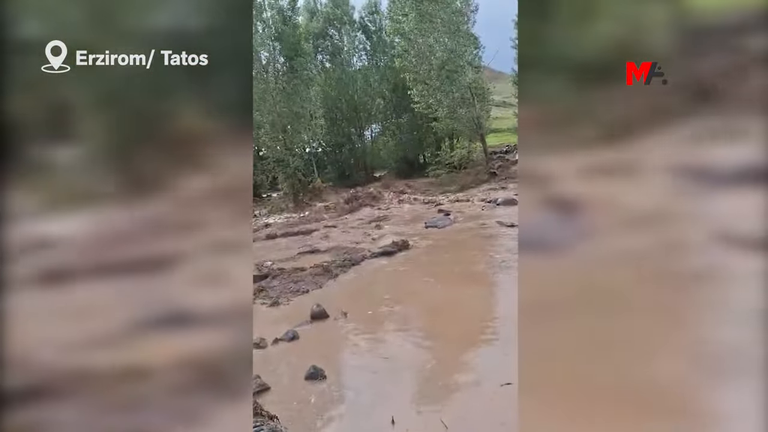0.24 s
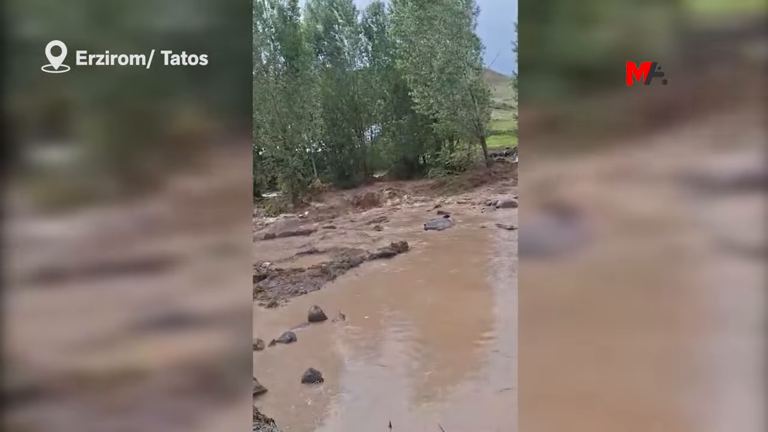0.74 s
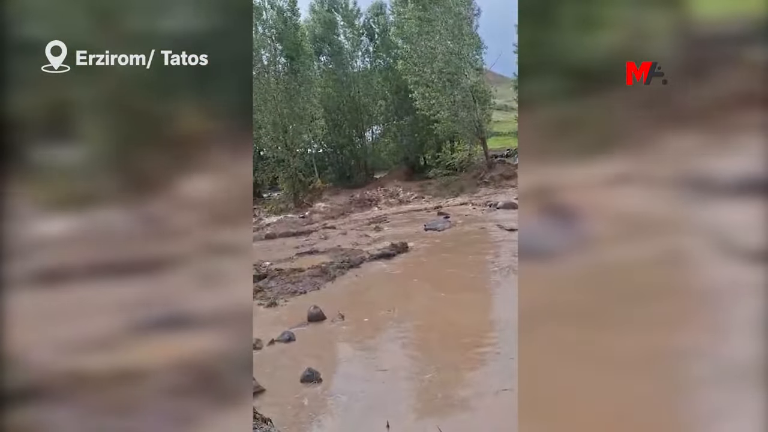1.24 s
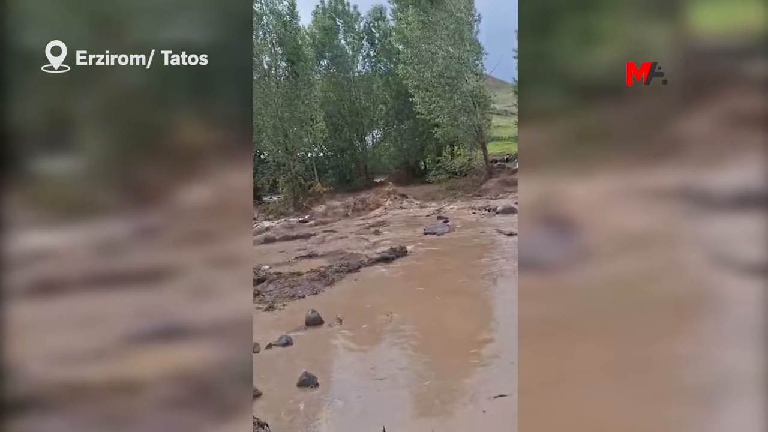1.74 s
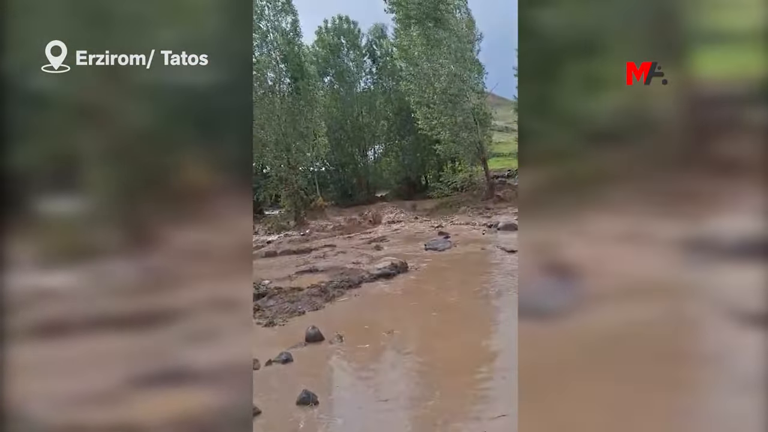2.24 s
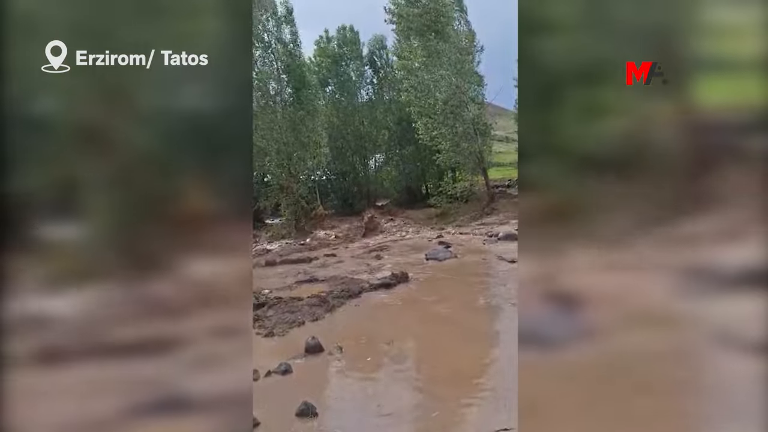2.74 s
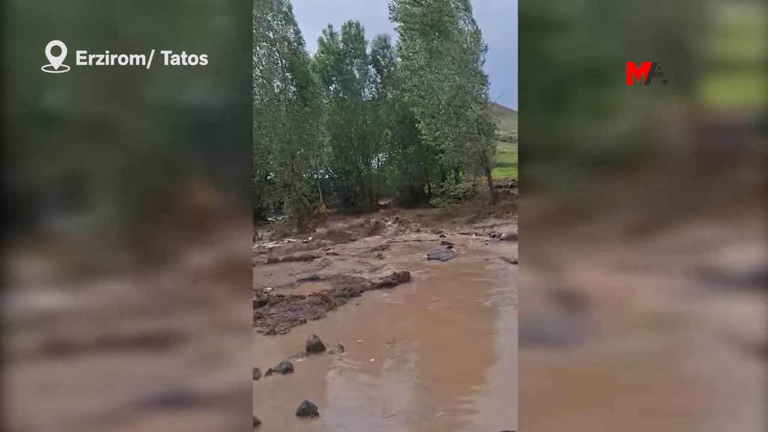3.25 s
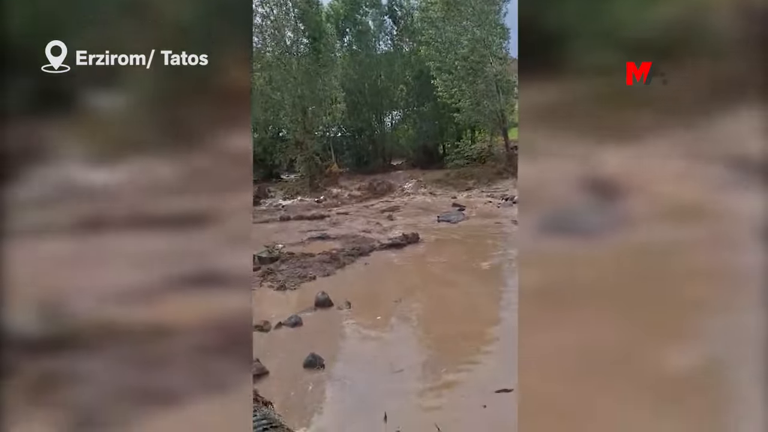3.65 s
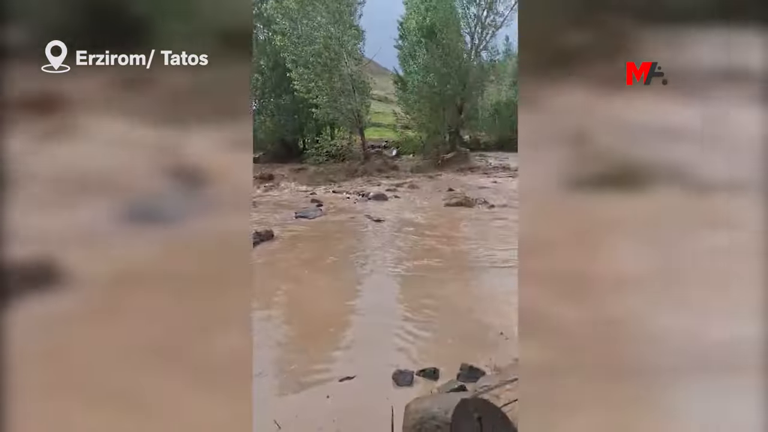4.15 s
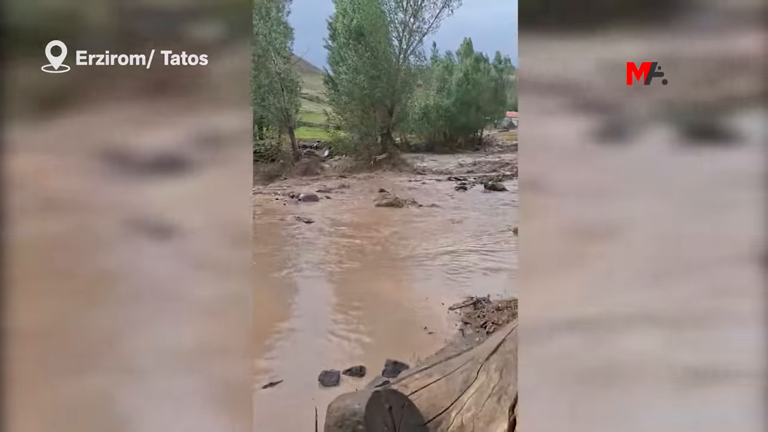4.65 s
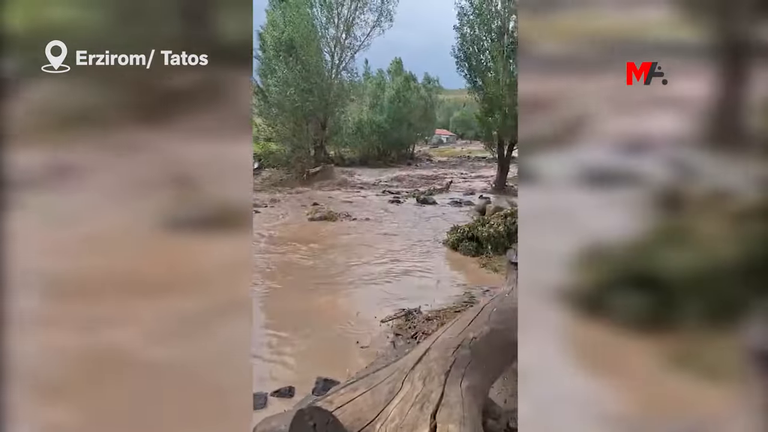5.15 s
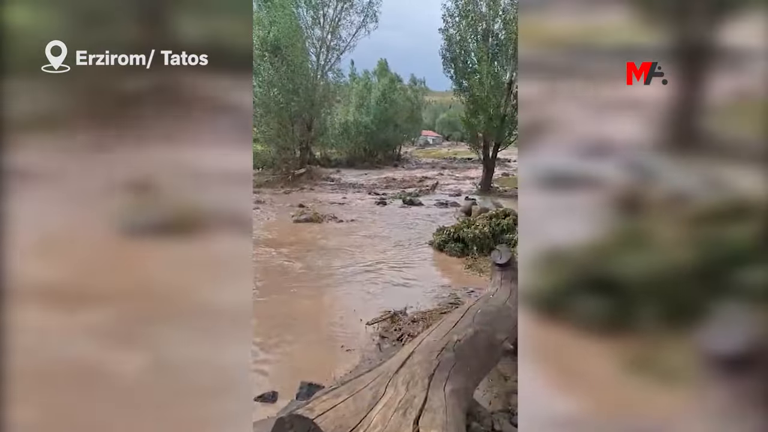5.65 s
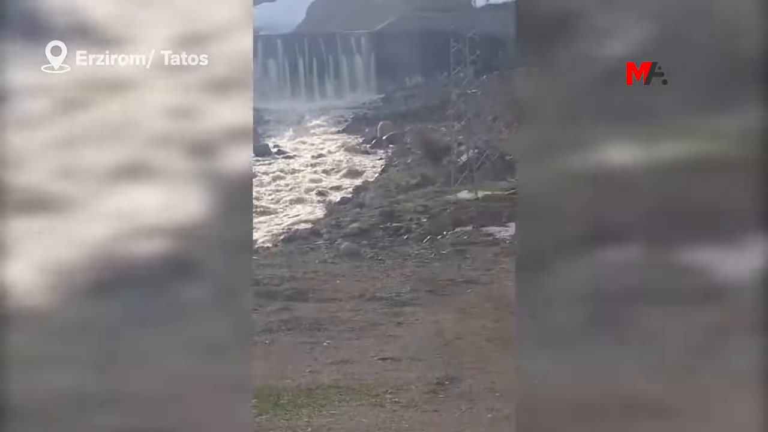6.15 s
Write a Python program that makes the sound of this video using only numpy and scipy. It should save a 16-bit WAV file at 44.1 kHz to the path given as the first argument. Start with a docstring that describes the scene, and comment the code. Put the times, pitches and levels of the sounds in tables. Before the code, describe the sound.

Close, wide stereo sound of fast floodwater, a dense steady rush with small splashes and gurgles. Over it lies rough wind noise on an unprotected handheld microphone: irregular low thuds, ragged puffs and fluttering, strongest around the middle and again late. The right side momentarily becomes thin and hollow. Water dips a little, partly recovers, then an abrupt cut leaves silence.

```python
"""A muddy flood roars and splashes over rocks, heard from the bank through a microphone's left and right ports.
The water is coloured noise mixed with many short bubble rings.
Wind is lumpy noise, with short swinging tones for hard thumps and ragged puffs of noise for flurries.
At times the rumble drops away on the right; loud peaks are clipped, and the sound is cut off before the end."""
import sys
import numpy as np
from scipy import signal
from scipy.fft import rfft, irfft, next_fast_len
from scipy.io import wavfile
from scipy.ndimage import uniform_filter1d

SR = 44100
rng = np.random.default_rng(int(sys.argv[2]) if len(sys.argv) > 2 else 0)


def inscribe(sig):
    """Save sig as 16-bit PCM at rate SR to the path in sys.argv[1].

    A 1-D sig is mono; a 2-D sig holds one channel per row.
    Samples are clipped to [-1, 1] before scaling.
    """
    pcm = np.round(np.clip(np.atleast_2d(sig).T, -1, 1) * 32767)
    wavfile.write(sys.argv[1], SR, pcm.astype(np.int16))


N = 282681
TIME = np.arange(N) / SR  # seconds


def gain_of(db):
    """Turns decibels into a factor for the wave's height."""
    return 10 ** (np.asarray(db) / 20)


def evened(x):
    """Scales a sound to an average strength (rms) of 1."""
    return x / np.sqrt(np.mean(x ** 2) + 1e-20)


def read(points, hz):
    """Reads the columns of a frequency table at the given frequencies, on a logarithmic pitch scale."""
    f, *columns = np.transpose(points)
    return [np.interp(np.log(hz + 1), np.log(f + 1), column) for column in columns]


def follow(rows):
    """Reads the columns of a time table at every sample."""
    s, *columns = np.transpose(rows)
    return [np.interp(TIME, s, column) for column in columns]


def coloured(x, spectrum):
    """Makes some pitches stronger than others, as the table says, then evens the strength."""
    size = next_fast_len(N)
    shape = gain_of(read(spectrum, np.fft.rfftfreq(size, 1 / SR))[0])
    return evened(irfft(rfft(x, size) * shape, size)[..., :N])


def wobble(rate_hz):
    """Smooth random drift of strength about 1; changes faster than the rate fade out."""
    size = next_fast_len(N)
    hz = np.fft.rfftfreq(size, 1 / SR)
    smooth = rfft(rng.standard_normal(size)) / (1 + (hz / rate_hz) ** 4)
    return evened(irfft(smooth, size))[:N]


def panned(db, tilt_db):
    """Gains of the left and right port for a level and a left minus right difference."""
    return gain_of(db + np.array([[tilt_db], [-tilt_db]]) / 2)


def bubbles(per_s, spread_db, cycles, low_hz, high_hz, count):
    """Bubbles of many sizes, each a short fading ring that rises in pitch; each size swells in clusters."""
    cluster_s, cluster_db = 0.04, 3.5  # spacing of clusters, and how much their levels differ
    out, t = np.zeros(N), np.arange(2500) / SR
    chance = per_s / count / SR  # of a bubble of one size at one sample
    knots = np.arange(0, N / SR + cluster_s, cluster_s)
    for hz in np.geomspace(low_hz, high_hz, count):
        age = t * hz  # in cycles
        swing = np.sin(2 * np.pi * age * (1 + 0.016 * age / cycles))
        ring = swing * np.exp(-age / cycles) * hz
        draw, pops = rng.random(N), np.zeros(N)
        born = draw < chance
        cluster = np.interp(TIME[born], knots, rng.standard_normal(len(knots)))
        # Many bubbles are soft and a few are much louder.
        loudness = np.minimum(np.log(chance / draw[born]), 3)
        pops[born] = gain_of(spread_db * loudness + cluster_db * cluster)
        out += signal.oaconvolve(pops, ring)[:N]
    return evened(out)


def churn(splash_db, gurgle_db):
    """Countless far bubbles fuse into noise; nearer ones splash, and a few by the bank gurgle on their own."""
    splash = bubbles(per_s=1800, spread_db=2.5, cycles=6.6, low_hz=401.9, high_hz=9000, count=28)
    gurgle = bubbles(per_s=90, spread_db=1.0, cycles=19, low_hz=703.2, high_hz=4544, count=22)
    return rng.standard_normal(N) + gain_of(splash_db) * splash + gain_of(gurgle_db) * gurgle


def at_ports(pair, patchy_db):
    """Blends two unrelated sounds into what the turning ports hear, patchy in pitch and time."""
    # How water reaches the two ports before the turn. Each row: frequency in Hz, likeness from 0 to 1,
    # left lead in radians, left minus right in dB.
    port_rows = [(150, 1, -2, -5.5), (428, 0.8, 0, -1.5), (648, 0.95, -0.1, 0), (840, 0.6, .5, -2),
                 (1270, 0.84, 0.56, 1), (1732, 0.7, -0.5, -3.5), (1900, 0.9, 1.96, -3),
                 (2660, 0.3, 2, -0.5), (3560, 0.5, 4, -0.5), (5040, 0.03, 6, 0.6), (9050, 0.05, 9, 0)]
    # What the microphone's turn along the stream adds. Each row: frequency in Hz, level change in dB,
    # change of likeness.
    turn_rows = [(401, -1.8, -.1), (651, -1.4, -0.39), (1280, 1, -0.026), (2080, -2.4, 0.016),
                 (3620, 1.2, -0.094), (5220, 0.3, 0), (6910, 3, -0.057), (9040, -0.5, -0.016),
                 (15030, 0.8, 0)]
    turn_from_s, turn_s = 3.37, 0.7  # start and length of the turn
    hz, t, (left, other) = signal.stft(pair, SR, nperseg=1024, noverlap=768)
    patches = rng.standard_normal(left.shape[::-1]).T
    patches = uniform_filter1d(patches, size=12, axis=0)  # smooth across pitch
    patches = evened(uniform_filter1d(patches, size=10, axis=1))  # smooth across time
    alike, lead, tilt_db = (column[:, None] for column in read(port_rows, hz))
    turned = np.clip((t - turn_from_s) / turn_s, 0, 1)
    turn_db, turn_alike = (column[:, None] * turned for column in read(turn_rows, hz))
    alike = np.clip(alike + turn_alike, 0, 1)
    right = (alike * left + np.sqrt(1 - alike ** 2) * other) * np.exp(-1j * lead)
    both = np.array([left * gain_of(tilt_db / 2), right * gain_of(-tilt_db / 2)])
    both = both * gain_of(patchy_db * patches + turn_db)
    return signal.istft(both, nperseg=1024, noverlap=768)[1][:, :N]


def flood(roar_db, wash_db, spray_db, surge_db, lapping_db):
    """Deep roar of tumbling water, wash lapping over rocks and hissing spray, all surging together."""
    # The water's course before the level shifts given to this function.
    # Each row: time in seconds, roar level in dB, wash level in dB, spray level in dB.
    flood_rows = [(0, -21, -23, -24), (0.7, -21.5, -22.5, -24.5), (1.4, -21, -21, -24),
                  (2.0, -21.5, -22.5, -25), (2.3, -22.5, -22, -25), (2.6, -22, -23, -25.1),
                  (2.92, -21.5, -21.5, -26.5), (3.05, -21.5, -22, -25), (3.45, -23, -24, -25.6),
                  (3.72, -21.5, -24.5, -24.5), (3.9, -20.5, -25, -25.8), (3.97, -25.5, -25.5, -28.5),
                  (4.25, -25.5, -28, -30.5), (4.45, -24, -25.5, -29.5), (4.62, -23, -25.5, -28),
                  (4.85, -21.5, -23.5, -28.5), (5.25, -22, -24, -29), (5.5, -23, -24.5, -29),
                  (5.72, -21, -23, -27.5)]
    # Colours of the three parts of the water. Each row: frequency in Hz, relative level in dB per Hz.
    roar_colour = [(60, -15), (200, -6.5), (430, -0.5), (680, 1), (850, -10.5), (1200, -23.5),
                   (2000, -50.5)]
    wash_colour = [(400, -26), (700, -9), (900, -3), (1300, -2), (1650, -2.2), (2000, 1), (2400, -10.5),
                   (3200, -14.5), (5000, -41.5)]
    spray_colour = [(1200, -22.5), (2500, -5.5), (3000, -5), (3450, -0.5), (4000, -3.5), (5000, -1.5),
                    (6000, -6.5), (7700, -7), (8600, -12.5), (15800, -16.5)]
    roar_level, wash_level, spray_level = follow(flood_rows)
    pair = np.array([churn(splash_db=-10.5, gurgle_db=-13.5) for _ in range(2)])
    water = at_ports(pair, patchy_db=1.14)
    roar = gain_of(roar_level + roar_db) * coloured(water, roar_colour)
    lapping = lapping_db * wobble(rate_hz=27)
    wash = gain_of(wash_level + wash_db + lapping) * coloured(water, wash_colour)
    spray = gain_of(spray_level + spray_db) * coloured(water, spray_colour)
    return (roar + wash + spray) * gain_of(surge_db * wobble(rate_hz=39))


def eddies(spectrum, lumpy_db, rate_hz):
    """Swirling air presses on the ports as lumpy noise, partly shared by the two."""
    # How alike the eddies are at the two ports. Each row: time in seconds, likeness from 0 to 1.
    alike_rows = [(0, 0.6), (1.2, 1), (2.6, 0.34), (3.5, 0.6), (4, 0), (4.7, 0.62), (5.7, 0.01)]
    alike = np.clip(follow(alike_rows)[0], 0, 1)
    shared, separate = rng.standard_normal(N), rng.standard_normal((2, N))
    air = np.sqrt(alike) * shared + np.sqrt(1 - alike) * separate
    return evened(coloured(air, spectrum) * gain_of(lumpy_db * wobble(rate_hz)))


def wind(buffet_db, flutter_db, flutter_gain):
    """Large eddies buffet the ports and small ones flutter above them; both rise and fall with the gusts."""
    # The wind's course before gusts and the level shifts given to this function.
    # Each row: time in seconds, buffeting level in dB, flutter level in dB.
    wind_rows = [(0, -18, -21.5), (0.3, -20.5, -21.5), (0.85, -23.5, -19.5), (1.15, -18.5, -21.5),
                 (1.65, -18.5, -19.5), (1.9, -19, -19.5), (2.4, -17, -17), (2.92, -17, -18.5),
                 (2.97, -16.5, -28), (3.27, -19.5, -21.5), (3.56, -18.5, -22), (3.63, -22.5, -22),
                 (4.1, -14.5, -23), (4.27, -20.5, -23), (4.6, -19.5, -21), (4.8, -26, -21),
                 (5.05, -20, -20.5), (5.21, -21, -21.5), (5.45, -17, -19.5), (5.65, -24, -23),
                 (5.74, -24, -26)]
    # Colours of the two kinds of eddy. Each row: frequency in Hz, relative level in dB per Hz.
    buffet_colour = [(15, -34), (33, -21), (55, -1.5), (80, -2.5), (130, -4), (200, -11), (400, -26.5),
                     (1000, -57)]
    flutter_colour = [(70, -16), (140, -5), (230, -0.5), (350, -3.5), (520, -13), (800, -25), (2000, -22.5),
                      (6000, -44.5)]
    buffet_level, flutter_level = follow(wind_rows)
    gust_db = 0.96 * wobble(rate_hz=12)  # random swings around the course
    buffet = eddies(buffet_colour, lumpy_db=2.0, rate_hz=16)
    buffet = buffet * gain_of(buffet_level + buffet_db + gust_db)
    flutter = eddies(flutter_colour, lumpy_db=2.5, rate_hz=84)
    flutter = flutter * gain_of(flutter_level + flutter_db + flutter_gain * gust_db)
    return buffet + flutter


def thumps(level_db, unsteady, breakup_db, lag_rad):
    """A hard eddy shakes the ports in a few uneven swings, slightly out of step, with smaller eddies on top."""
    # Single hard eddies; the pitch wavers around its value and the level is shifted by level_db.
    # Each row: middle in seconds, half length in seconds, level in dB, pitch in Hz, left minus right in dB.
    thump_rows = [(0.046, .024, -10, 105, 3), (0.093, 0.025, -10, 85, 2.5), (0.403, 0.026, -7, 99, 1),
                  (0.753, 0.026, -8, 114, 2.5), (0.985, .04, -7, 78.5, 0.5), (1.064, 0.026, -7.5, 105, -3),
                  (1.123, .02, -7, 115, 0), (1.387, .024, -6.5, 93.5, -2), (1.544, 0.033, -3.5, 96.5, -1),
                  (1.659, 0.023, -13, 84, -1), (1.839, .028, -5.5, 137, -3.5), (1.938, .024, -9, 134.5, -7),
                  (1.997, .028, -8.5, 125, 3), (2.245, 0.029, -5, 79.5, 4.5), (2.275, 0.033, -6, 78, 6),
                  (2.321, 0.025, -11, 107, 3), (2.42, 0.029, -11, 84.6, 5.5), (2.541, .034, -3, 78, -2.5),
                  (2.577, 0.034, -7.5, 66, -1), (2.671, 0.023, -7, 81, 2), (2.775, 0.025, -4.5, 87.5, 4.5),
                  (2.804, 0.023, -8, 120, 0), (2.846, .03, -9, 80.5, -2), (2.893, 0.027, -6.5, 86.5, 0),
                  (2.927, .018, -11, 88, 4), (3.111, .026, -8, 88, -2), (3.246, .038, 1, 69.2, 0),
                  (3.298, 0.039, -3, 87, 0), (3.34, 0.035, -3, 80, 4), (3.361, 0.019, -15, 90, 0),
                  (3.445, .026, -7.5, 97, 6.5), (3.493, .032, -4, 85, -4), (3.583, 0.029, -4.5, 96.7, 0.5),
                  (3.82, 0.0348, -7, 70, 6), (4.175, 0.021, -11, 84, 12), (4.404, 0.023, -7.5, 83, -1),
                  (4.429, 0.022, -10, 125, 1), (4.585, .024, -13, 93, -1), (5.004, 0.041, -10.5, 76.7, 3),
                  (5.074, 0.024, -8.5, 85, -0.5), (5.117, 0.025, -7, 82, 6), (5.26, 0.02, -10.5, 89, 2.5),
                  (5.351, .036, 0, 78, 0), (5.387, 0.021, -11, 80, -0.5), (5.456, .02, -11, 110.4, -10),
                  (5.458, .014, -3.5, 312, -0.5), (5.474, .014, -5, 85.7, 1.5),
                  (5.498, 0.0238, -12.5, 130, 6), (5.622, 0.021, -10, 77.4, -2.5)]
    # Colour of the smaller eddies. Each row: frequency in Hz, relative level in dB per Hz.
    breakup_colour = [(60, -9.5), (150, 7.5), (330, -6.5), (500, -11), (900, -18), (2500, -29.5),
                      (6000, -52.5)]
    out, stray = np.zeros((2, N)), wobble(rate_hz=90)
    breakup = gain_of(breakup_db) * eddies(breakup_colour, lumpy_db=2.0, rate_hz=85)
    chances = rng.random((len(thump_rows), 2))
    for (s, half, db, hz, tilt_db), (phase, lag) in zip(thump_rows, chances):
        near = abs(TIME - s) < half
        turns = np.cumsum(hz * np.exp(unsteady * stray[near])) / SR + phase
        port_phase = np.array([[0], [lag * lag_rad]])  # left, right
        swings = np.sin(2 * np.pi * turns + port_phase)
        swell = np.cos(np.pi / 2 * (TIME[near] - s) / half) ** 4
        out[:, near] += panned(db + level_db, tilt_db) * swell * (swings + breakup[:, near])
    return out


def lulls(pair):
    """The rumble drops away on the right, leaving a thin, hollow rush on that side."""
    # Each row: start in seconds, end in seconds, drop of the rumble in dB.
    lull_rows = [(2.043, 2.115, 4), (2.343, 2.39, 12), (2.947, 2.995, 23), (3.894, 4.124, 23),
                 (4.133, 4.307, 17), (4.32, 4.37, 13), (4.46, 4.515, 9), (5.285, 5.32, 10)]
    drop_db = sum(db * ((TIME > start) & (TIME < end)) for start, end, db in lull_rows)
    drop_db = uniform_filter1d(drop_db, size=600)  # soften the edges
    low_pass = signal.butter(4, 297, fs=SR, output="sos")  # the rumble lies below about 297 Hz
    rumble = signal.sosfiltfilt(low_pass, pair[1])
    return np.array([pair[0], pair[1] - rumble * (1 - gain_of(-drop_db))])


def flurries(level_db, ragged_db, rate_hz):
    """Fast air tears at each port separately, in ragged puffs that swell and die, each flurry at its own pitch."""
    # Levels here are shifted by level_db. Each row: middle in seconds, half length in seconds, level in dB,
    # left minus right in dB, pitch in Hz.
    flurry_rows = [(2.29, 0.091, -22, -8, 300), (2.56, 0.041, -21, -9, 270), (2.888, 0.07, -21.5, -4, 230),
                   (3.08, 0.095, -21.5, 3, 320), (3.283, 0.12, -20.5, -2, 300),
                   (3.53, 0.079, -21.5, -12, 360), (3.74, 0.068, -12, -4, 344),
                   (4.01, 0.19, -19.5, -8.5, 466), (4.417, 0.056, -25, -1, 290),
                   (4.936, 0.023, -18, -3.5, 290), (5.062, 0.02, -9, -1, 250),
                   (5.148, 0.1, -18.5, -0.5, 370), (5.343, 0.019, -8.5, -3, 280),
                   (5.448, 0.037, -13.5, -1, 340), (5.503, 0.038, -15, -3, 348),
                   (5.63, 0.11, -19.5, -2, 328)]
    # Colour of a flurry pitched at 300 Hz; it slides with the pitch.
    # Each row: frequency in Hz, relative level in dB per Hz.
    flurry_colour = [(70, -18), (170, 0), (300, 3.5), (400, 1.5), (580, -8.5), (1000, -19.5), (2000, -28.5),
                     (6000, -49)]
    colour_hz = 300
    puffs = gain_of(ragged_db * np.array([wobble(rate_hz) for _ in range(2)]))
    out, air = np.zeros((2, N)), rng.standard_normal((2, N))
    for s, half, db, tilt_db, pitch_hz in flurry_rows:
        near = abs(TIME - s) < half
        size = near.sum()
        hz = np.fft.rfftfreq(size, 1 / SR) * colour_hz / pitch_hz
        shape = gain_of(read(flurry_colour, hz)[0])
        tearing = evened(irfft(rfft(air[:, near]) * shape, size) * puffs[:, near])
        swell = 1 - ((TIME[near] - s) / half) ** 2
        out[:, near] += panned(db + level_db, tilt_db) * swell * tearing
    return out


def scene():
    """Adds steady wind, flurries and thumps to the flood, then thins the right side in the lulls."""
    water = flood(roar_db=0.37, wash_db=-0.36, spray_db=-0.68, surge_db=0.6, lapping_db=0.13)
    gusts = wind(buffet_db=1.5, flutter_db=1.15, flutter_gain=0.81)
    gusts = gusts + flurries(level_db=-0.5, ragged_db=3.5, rate_hz=70)
    hard_eddies = thumps(level_db=-1, unsteady=0.28, breakup_db=-13, lag_rad=1.5)
    return lulls(water + gusts + hard_eddies)


def record(dry):
    """Clips overloads at full scale, stops the sound abruptly, then removes the highest treble."""
    stop_s, fade_s, edge_hz = 5.744, 0.0012, 15850
    clipped = np.clip(dry, -1, 1)
    stopped = clipped / (1 + (np.maximum(TIME - stop_s, 0) / fade_s) ** 2)
    low_pass = signal.firwin(511, edge_hz, window=("kaiser", 9), fs=SR)
    return signal.oaconvolve(stopped, low_pass[None], "same")


dry = scene()
out = record(dry)
inscribe(out)
```